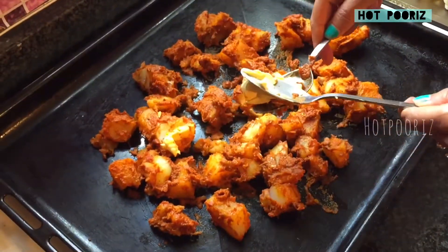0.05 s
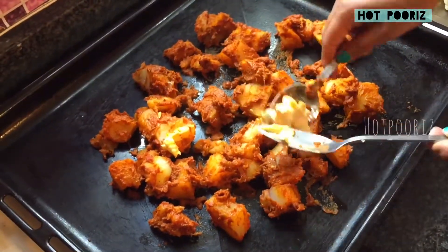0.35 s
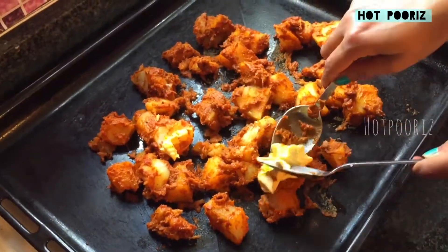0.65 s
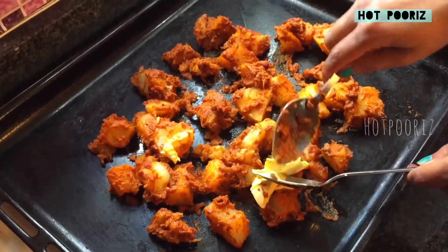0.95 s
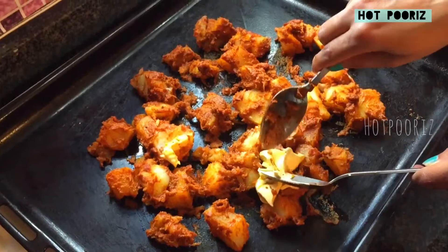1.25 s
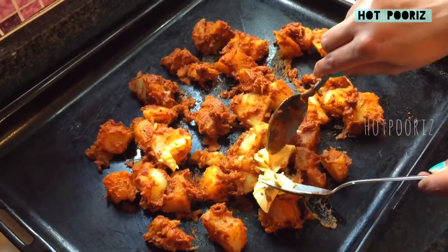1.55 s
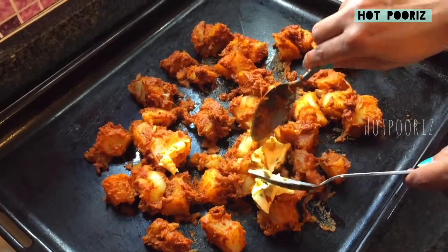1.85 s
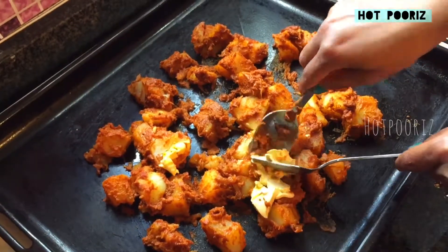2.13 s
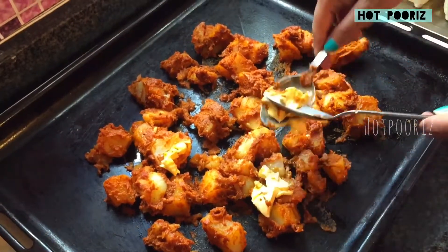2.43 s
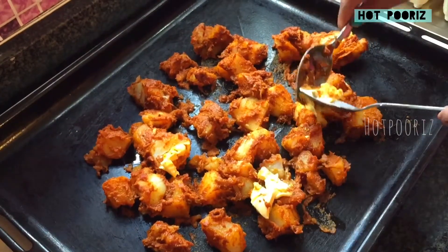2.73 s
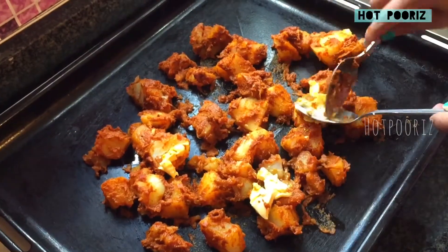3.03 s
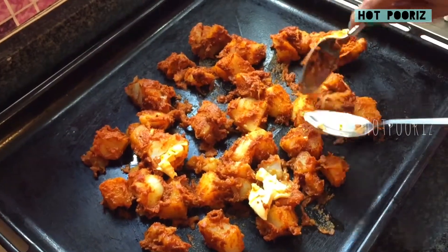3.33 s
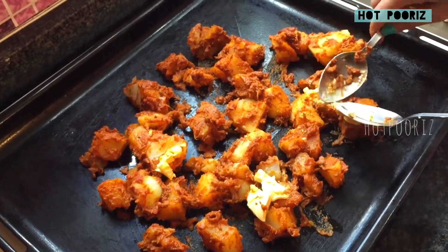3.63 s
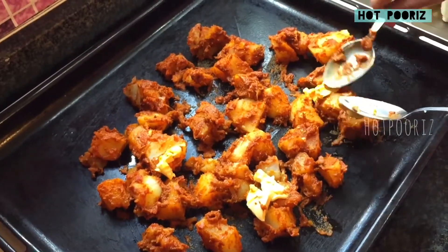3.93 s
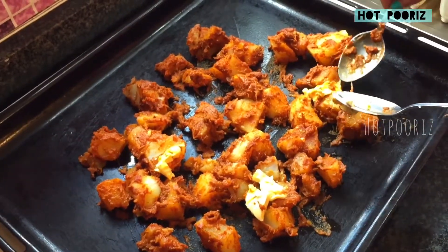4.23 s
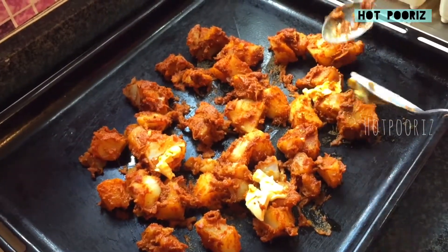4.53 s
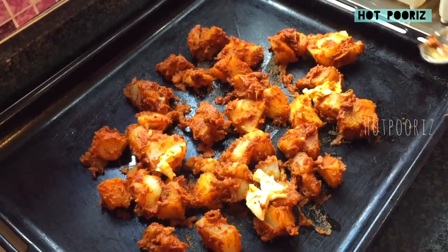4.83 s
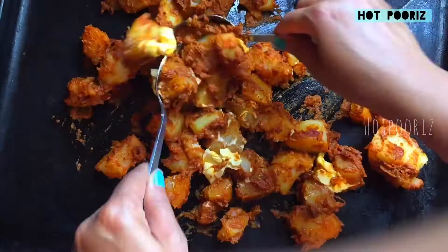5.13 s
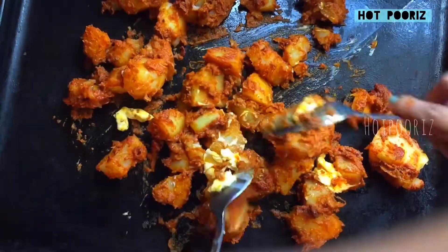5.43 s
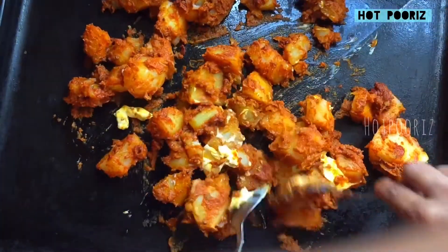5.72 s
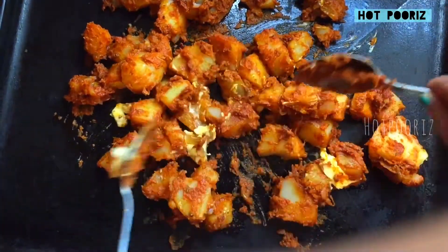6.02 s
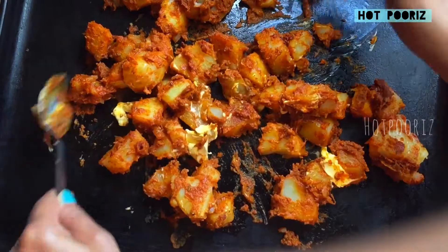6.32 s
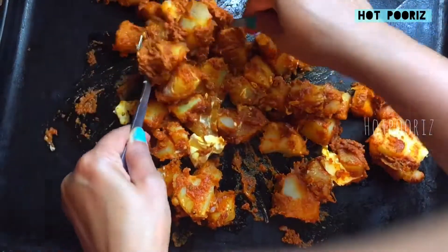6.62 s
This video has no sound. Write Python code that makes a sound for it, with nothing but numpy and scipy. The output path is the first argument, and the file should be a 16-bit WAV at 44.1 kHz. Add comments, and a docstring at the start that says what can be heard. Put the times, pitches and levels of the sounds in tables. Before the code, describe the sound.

In a small kitchen with a low hush, a close microphone picks up sticky food clicking faintly under two steel spoons, along with a few soft thuds. One spoon scrapes and clinks on the other in two short bursts. A lull follows, then more wet clicks and a run of hard knocks and rough, squeaky scrapes on a metal baking tray, the strongest blows slightly overloading the microphone.

```python
"""Soft bumps and wet clicks come first, as two steel spoons turn sticky food on a metal baking tray.
The spoons clink and scrape on each other to push off lumps, then strike and drag across the tray.
Impacts and stick-slip friction excite the damped modes of the metal; sauce pops and sticky films snap.
A small kitchen reverberates over a steady hush, and the loudest blows overload the close microphone."""
import sys
import numpy as np
from scipy import signal
from scipy.fft import rfft, irfft, next_fast_len
from scipy.io import wavfile
from scipy.ndimage import uniform_filter1d

SR = 44100
rng = np.random.default_rng(int(sys.argv[2]) if len(sys.argv) > 2 else 0)


def inscribe(sig):
    """Save sig as 16-bit PCM at rate SR to the path in sys.argv[1].

    A 1-D sig is mono; a 2-D sig holds one channel per row.
    Samples are clipped to [-1, 1] before scaling.
    """
    pcm = np.round(np.clip(np.atleast_2d(sig).T, -1, 1) * 32767)
    wavfile.write(sys.argv[1], SR, pcm.astype(np.int16))


N = 294147


def amp(db):
    return 10 ** (np.asarray(db) / 20)


def unit_rms(x):
    return x / np.sqrt(np.mean(x ** 2) + 1e-20)


def unit_energy(x):
    return x / np.sqrt(np.sum(x ** 2) + 1e-20)


def decay(t, t60):
    """Exponential damping: a fall of 60 dB in t60 seconds."""
    return np.exp(-np.log(1000) * t / t60)


def along(points, hz):
    """Interpolation of (Hz, value) points on a logarithmic frequency axis."""
    f, v = np.transpose(points)
    return np.interp(np.log(hz + 1), np.log(f + 1), v)


def filtered(x, response):
    """Linear filtering: the spectrum is multiplied by a frequency response."""
    size = next_fast_len(len(x) + 4096)
    return irfft(rfft(x, size) * response(np.fft.rfftfreq(size, 1 / SR)), size)[:len(x)]


def noise(colour_db, size):
    """Spectral shaping: noise of rms 1 whose level in dB is a function of frequency."""
    return unit_rms(filtered(rng.standard_normal(size), lambda hz: amp(colour_db(hz))))


def add(track, start_s, sound):
    """Superposition: a sound is summed into the track."""
    span = track[max(round(start_s * SR), 0):][:len(sound)]
    span += sound[:len(span)]


# Modes of the two spoons and the tray. Each row: frequency in Hz, level in dB, t60 in seconds.
LEFT_SPOON_MODES = [(1093, -16, 0.039), (1987, -6.5, 0.049), (2270, -9.5, 0.038), (3140, -19.5, 0.018),
                    (4140, 2.5, 0.033), (4340, 3.5, 0.039), (5290, -1, 0.032), (5600, -4.5, 0.056),
                    (6143, 1, 0.021), (7310, 1, 0.023), (8590, -9.5, 0.033), (11500, 0, 0.014),
                    (10900, -4.5, 0.016)]
RIGHT_SPOON_MODES = [(1277, -10.5, 0.065), (1430, -15.5, 0.032), (2020, -9, 0.087), (2430, -7, .06),
                     (3016, -6, .09), (3165, 2, 0.031), (3690, -11, .07), (5430, -7, .06),
                     (5680, 10.5, 0.028), (6000, 1, 0.019), (7200, -6, 0.036), (8103, -1.5, 0.021),
                     (9440, -8.5, 0.062), (12550, -8, 0.081)]
TRAY_MODES = [(573, -6.5, 0.086), (620.7, -3, 0.16), (692, -7, 0.13), (1023.4, -4.5, .18), (1120, 2, 0.056),
              (1358, -10.5, 0.094), (1610, -15.5, .15), (1820, -4, 0.2), (1936, -4, 0.46), (2182, -5, 0.13),
              (2210, -2.5, 0.22), (2360, -17, 0.24), (2780, -7, 0.11), (2785, 1, 0.14), (3040, -13.5, 0.42),
              (3150, -10, 0.13), (3614, 7, 0.056), (3566, 2, 0.15), (4040, -7.5, 0.097), (4420, 0, 0.052),
              (4830, -10, 0.05), (5690, -10.5, 0.14)]
MODES = {"left": LEFT_SPOON_MODES, "right": RIGHT_SPOON_MODES, "tray": TRAY_MODES}
# Each part's clash of dense, quickly damped modes. Each row: frequency in Hz, spectral level in dB.
CLASH_SPECTRA = { "left": [(100, -51), (650, -41), (1050, -8), (1600, -6.5), (2200, -0.5), (3700, -3),
                 (4400, 3), (6500, 0.5), (9800, -6), (11500, -1.5), (16000, -7)], "right": [(100, -34.5),
                 (450, -27), (850, -15.5), (1300, -8), (3100, 4), (4900, -4.5), (5900, 6), (7200, -3),
                 (11000, -5.5), (16000, -1.5)], "tray": [(50, -15), (250, -15), (430, -13.5), (600, 2.5),
                 (830, -8.5), (1150, 0.5), (2500, 3), (4400, 1), (5400, -4), (7500, -8.5), (10500, -20),
                 (16000, -22.5)]}
# Metal parts. Each entry: ring relative to clash in dB, clash t60 in seconds (raised to at least
# shortest_clash_s), radiation cutoff in Hz, share sent to the room in dB.
METAL_PARTS = {"left": (-5, -0.07, 903, -17), "right": (-5, 0.0746, 660.5, -14),
               "tray": (-5, 0.0761, 310, -12)}


def metal_tap(part, bright_db, muffle_db, clash_scale=1, shortest_clash_s=0.01, contact_s=0.0004):
    """Modal vibration: a tap excites a short clash and a longer ring of damped sinusoids."""
    t = np.arange(SR // 6) / SR
    tilt_db = lambda hz: bright_db * np.log2(np.clip(hz, 500, SR) / 3000)
    ring_db, clash_t60, cutoff_hz, _ = METAL_PARTS[part]
    hz, db, t60 = np.transpose(MODES[part])[:, :, None]
    # grip and load shift the modes a little from one contact to the next
    hz = hz * (1 + 0.004 * rng.standard_normal(hz.shape))
    scatter_db = 2.5 * rng.standard_normal(hz.shape)
    strength = amp(db + tilt_db(hz) + scatter_db) * rng.choice([-1, 1], hz.shape)
    ring = np.sum(strength * decay(t, t60) * np.sin(2 * np.pi * hz * t), axis=0)
    clash = noise(lambda f: along(CLASH_SPECTRA[part], f) + tilt_db(f), len(t))
    clash *= decay(t, max(clash_scale * clash_t60, shortest_clash_s))
    motion = unit_energy(clash) + amp(ring_db - muffle_db) * unit_energy(ring)
    motion *= 1 - np.exp(-t / contact_s)  # sauce softens the first instant of contact
    # thin metal pushes little air at low frequencies
    radiation = signal.butter(4, cutoff_hz, "highpass", fs=SR, output="sos")
    return unit_energy(signal.sosfilt(radiation, motion))


# Blows. Each row: start in seconds, strength in dB, brightness in dB per octave, part that rings.
BLOWS = [(2.2468, 3, -2, "left"), (2.2841, -11, 4.5, "left"), (2.3165, 8.5, -1, "left"),
         (2.3402, 6.5, 6, "left"), (2.817, -8, 4, "right"), (2.844, -22, 11, "right"),
         (3.117, 22, 2, "right"), (5.318, -0.6, 0.8, "right"), (5.716, 26, -0.5, "tray"),
         (5.823, 5.5, 3.5, "tray"), (6.2906, 20.5, -1, "tray"), (6.4384, 24, 2.5, "tray"),
         (6.6354, 13.5, 0.5, "tray")]
# For each part: how much the landing spoon and the food hold back the ring, in dB.
BLOW_MUFFLE_DB = {"left": -4, "right": -2.5, "tray": 2.5}


def blows(part, hard_db=18):
    """Impact excitation: a spoon lands on metal; a light touch stays short and dry in the food."""
    out = np.zeros(N)
    for start, db, bright_db, struck in BLOWS:
        if struck == part:
            lighter_db = max(hard_db - db, 0)
            muffle_db = BLOW_MUFFLE_DB[part] + 0.15 * lighter_db
            tap = metal_tap(part, bright_db, muffle_db, clash_scale=amp(-0.5 * lighter_db))
            add(out, start, amp(db) * tap)
    return out


def tray_thuds(relative_db=-50.5, t60=0.065):
    """Momentum transfer: each blow pushes the whole tray, in proportion to its strength."""
    out, t = np.zeros(N), np.arange(SR // 10) / SR
    for start, db, _, struck in BLOWS:
        if struck == "tray":
            add(out, start, amp(db + relative_db) * thud(t, t60))
    return out


# The tray moving as a whole. Each row: frequency in Hz, spectral level in dB.
THUD_SPECTRUM = [(20, -14), (60, -2), (170, 4), (400, -8), (1500, -45.5)]


def thud(t, t60):
    """Damped bulk motion: one push gives a short burst of low noise."""
    return noise(lambda f: along(THUD_SPECTRUM, f), len(t)) * decay(t, t60)


# Strokes of a spoon's edge. Each row: time of the hardest push in seconds, level in dB,
# swell and release in seconds, brightness in dB per octave, part that rings.
STROKES = [(2.3, -31, 0.046, 0.043, -4, "left"), (2.352, -18.5, 0.052, 0.044, -1, "left"),
           (2.465, -29.5, 0.046, 0.041, 2, "left"), (3.145, -31, 0.018, 0.1, -3, "right"),
           (3.24, -12.5, .036, 0.0031, 1.56, "right"), (5.39, -48.5, 0.14, 0.08, -4, "right"),
           (5.23, -45.5, 0.037, 0.27, 0, "tray"), (5.757, -14.5, 0.046, 0.029, -3, "tray"),
           (5.941, -44, 0.088, 0.081, 4, "tray"), (6.375, -11, 0.016, 0.061, -1, "tray"),
           (6.409, -4, 0.018, 0.018, -0.1, "tray"), (6.456, -11, 0.0077, 0.041, 2, "tray"),
           (6.54, -5.5, 0.065, 0.041, 1, "tray"), (6.665, -26, 0.15, .035, -1, "tray")]
# For each part: how much the pressing edge holds back the ring, in dB.
SCRAPE_MUFFLE_DB = {"left": 0, "right": 2.6, "tray": 0.7}


def scrapes(part, slips_per_s=1600, spread_db=3.5, fade_db=16, contact_points=3):
    """Irregular stick-slip friction: each slip of a dragged edge taps one of a few contact points."""
    out, t = np.zeros(N), np.arange(-SR // 8, SR // 4) / SR
    for peak_s, db, swell, release, bright_db, rubbed in STROKES:
        if rubbed == part:
            slipping = rng.random(len(t)) < slips_per_s / SR
            slips = slipping * amp(spread_db * rng.standard_normal(len(t)))
            slips *= rng.choice([-1, 1], len(t))
            from_peak = np.maximum(-t / swell, t / release)
            touching = np.clip((1.3 - from_peak) / 0.3, 0, 1)  # the edge lifts off at both ends
            force = unit_rms(slips) * amp(db - fade_db * from_peak) * touching
            point = rng.integers(contact_points, size=len(t))
            for k in range(contact_points):
                tap = metal_tap(part, bright_db, SCRAPE_MUFFLE_DB[part])
                add(out, peak_s + t[0], signal.fftconvolve(force * (point == k), tap))
    return out


# Squeaks. Each row: start in seconds, first and last pitch in Hz, peak level in dB.
SQUEAKS = [(2.329, 11830, 11440, -19.5), (2.439, 3266, 3130, -34), (5.27, 4550, 4330, -35.5),
           (5.369, 4370, 4156, -30.5), (6.531, 3064, 3836, -6), (6.547, 4460, 4446, -6.5)]


def squeaks(length_s=0.0234, waver=0.038):
    """Periodic stick-slip friction: steel on steel gives a brief, unsteady whistle."""
    out, t = np.zeros(N), np.arange(SR // 10) / SR
    progress = np.minimum(t / length_s, 1)
    for start, first_hz, last_hz, db in SQUEAKS:
        glide_hz = first_hz + (last_hz - first_hz) * progress
        jitter = unit_rms(uniform_filter1d(rng.standard_normal(len(t)), size=30))
        phase = 2 * np.pi * np.cumsum(glide_hz * (1 + waver * jitter)) / SR
        add(out, start, amp(db) * np.sin(np.pi * progress) * np.sin(phase))
    return out


# The loudest wet clicks. Each row: start in seconds, strength in dB, resonance in Hz.
LOUD_CLICKS = [(0.894, -20, 13300), (1.137, -28, 7060), (1.2004, -27, 12000), (1.478, -19, 14200),
               (1.49, -16.5, 5900), (1.538, -29.5, 4400), (1.548, -25.5, 11500), (1.7615, -27, 8400),
               (2.196, -25, 8400), (3.631, -22.5, 11700), (5.2064, -25.5, 12000), (5.221, -24.5, 6000),
               (5.251, -22, 7200), (5.306, -11, 7200), (5.378, -14, 7450)]


def food_clicks(t60=0.02, width_octaves=0.33):
    """Film rupture: sticky films snap with a broad resonance as the spoons pull away from the food."""
    out, t = np.zeros(N), np.arange(SR // 10) / SR
    for start, db, hz in LOUD_CLICKS + faint_clicks():
        resonance_db = lambda f: -20 * np.log10(1 + (np.log2((f + 1) / hz) / width_octaves) ** 2)
        snap = noise(resonance_db, len(t)) * decay(t, t60)
        add(out, start, amp(db) * unit_energy(snap))
    return out


# Food smeared under a spoon. Each row: middle and half length in seconds, level in dB.
SMEARS = [(0.443, 0.14, -65.5), (0.722, 0.074, -72), (1.21, 0.063, -64.5), (1.526, 0.055, -65),
          (2.834, 0.028, -52.5), (3.675, 0.11, -72), (5.246, 0.043, -45.5), (5.386, 0.03, -55),
          (5.95, 0.05, -52.5)]
# The crackle of sauce. Each row: frequency in Hz, spectral level in dB.
SMEAR_SPECTRUM = [(300, -30.5), (1200, -7.5), (2200, 4.5), (4000, -4), (7000, -3), (10000, -12.5),
                  (16000, -13.5)]


def smears(pops_per_s=1200, spread_db=3.0):
    """Shot noise: sauce pressed between spoon and food crackles with tiny independent pops."""
    t = np.arange(N) / SR
    pops = (rng.random(N) < pops_per_s / SR) * amp(spread_db * rng.standard_normal(N))
    crackle = unit_rms(filtered(pops, lambda hz: amp(along(SMEAR_SPECTRUM, hz)) * (hz > 200)))
    pressure = sum(amp(db) * np.exp(-((t - middle) / half) ** 2) for middle, half, db in SMEARS)
    return crackle * pressure


def faint_clicks(per_smear=3, usual_click_db=-34.5, usual_smear_db=-60, centre_hz=12000):
    """Random rupture: rows like LOUD_CLICKS for small films, which snap louder in a heavier smear."""
    rows = []
    for middle, half, smear_db in SMEARS:
        size, pitch = rng.standard_normal((per_smear, 2)).T
        starts = middle + half * rng.uniform(-1, 1, per_smear)
        db = usual_click_db + 0.45 * (smear_db - usual_smear_db) + 1.5 * size
        rows += zip(starts, db, centre_hz * 2 ** (0.22 * pitch))
    return rows


# Bumps of the hands and food. Each row: start in seconds, relative level in dB, t60 in seconds.
BUMPS = [(0.089, -49, 0.48), (.826, -41.5, 0.23), (1.641, -54, 0.17), (2.515, -45, 0.12),
         (3.92, -49.5, 0.11), (4.13, -56.5, 0.29), (5.301, -54, .2)]
# Their dull tone. Each row: frequency in Hz, spectral level in dB.
BUMP_SPECTRUM = [(20, -28), (45, 1), (65, 6.5), (115, 0), (180, -27.5), (400, -47), (1500, -67.5)]


def bumps(rise_s=0.0088):
    """Structure-borne sound: soft pushes come through the tray as dull thuds."""
    out, t = np.zeros(N), np.arange(SR // 2) / SR
    onset = 2 * (1 - np.exp(-t / rise_s))
    for start, db, t60 in BUMPS:
        rumble = noise(lambda f: along(BUMP_SPECTRUM, f), len(t))
        add(out, start, amp(db) * rumble * onset * decay(t, t60))
    return out


# Reverberation times of the kitchen. Each row: frequency in Hz, t60 in seconds.
KITCHEN_T60 = [(200, 0.71), (700, .45), (2500, 0.5), (6000, 0.35), (15000, 0.32)]


def kitchen_echo(x, build_up_s=0.0086):
    """Reverberation: reflections from hard walls die away at a rate that depends on frequency."""
    out, block = np.zeros(N), SR // 3
    for i in range(0, N, block):  # a new tail for each block: the echoes change as the hands move
        hz, t, spectra = signal.stft(rng.standard_normal(SR // 2), SR, nperseg=256)
        spectra *= decay(t, along(KITCHEN_T60, hz)[:, None])
        _, tail = signal.istft(spectra, SR, nperseg=256)
        tail *= 1 - np.exp(-np.arange(len(tail)) / SR / build_up_s)
        add(out, i / SR, signal.fftconvolve(x[i:i + block], unit_energy(tail)))
    return out


# The hush of the room. Each row: frequency in Hz, spectral level in dB.
ROOM_TONE_SPECTRUM = [(12, -46), (20, -22.5), (39, -6.5), (96, -1), (177, -10), (310, -8.5), (499, -15),
                      (590, -8.5), (698, -14.5), (849, -11), (1480, -12.5), (2140, -17.5), (6360, -28),
                      (14700, -32), (16000, -35)]


def room_tone(db=-58):
    """Stationary noise: a steady hush, strongest in the bass."""
    return amp(db) * noise(lambda f: along(ROOM_TONE_SPECTRUM, f), N)


def scene(small_sounds_to_room_db=-16):
    """Superposition: direct sound of metal and food adds to the reverberant field and the room tone."""
    direct = squeaks() + food_clicks() + smears() + bumps() + tray_thuds()
    to_walls = amp(small_sounds_to_room_db) * direct
    for part, (_, _, _, room_db) in METAL_PARTS.items():
        metal = blows(part) + scrapes(part)
        direct += metal
        to_walls += amp(room_db) * metal
    return (direct + room_tone() + kitchen_echo(to_walls))[None]


def record(dry, top_hz=15800):
    """Overload and band limiting: the loudest blows clip at full scale, then the top treble is cut."""
    clipped = np.clip(dry[0], -1, 1)
    return filtered(clipped, lambda hz: np.clip((top_hz - hz) / 500 + 0.5, 0, 1))[None]


dry = scene()
out = record(dry)
inscribe(out)
```